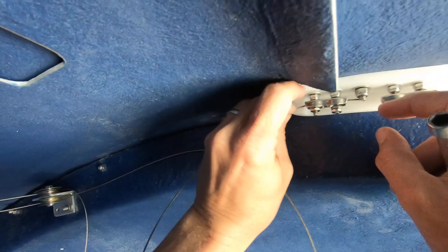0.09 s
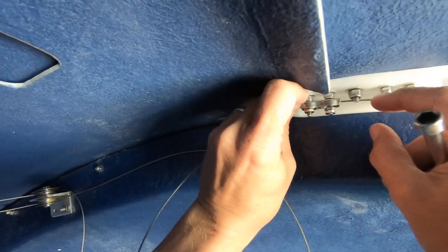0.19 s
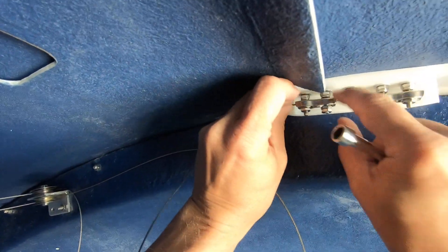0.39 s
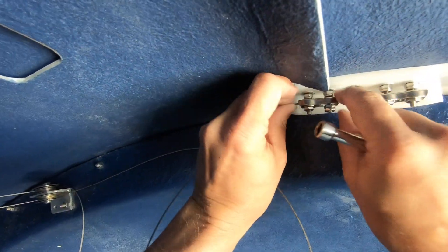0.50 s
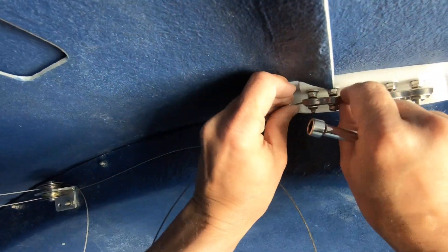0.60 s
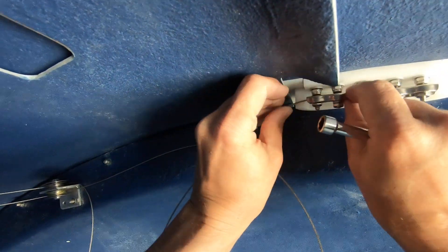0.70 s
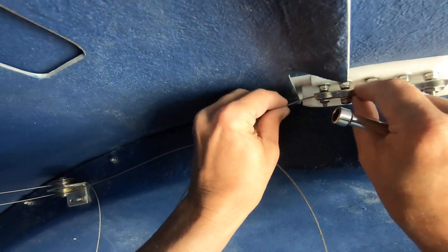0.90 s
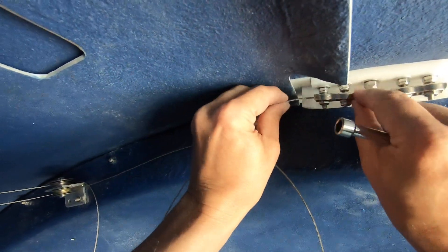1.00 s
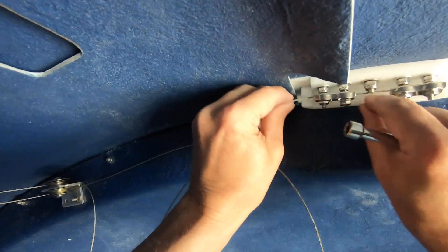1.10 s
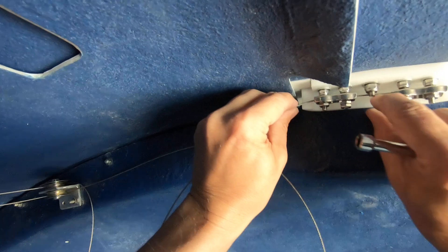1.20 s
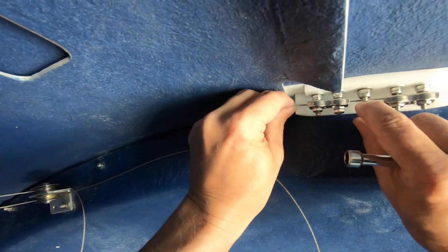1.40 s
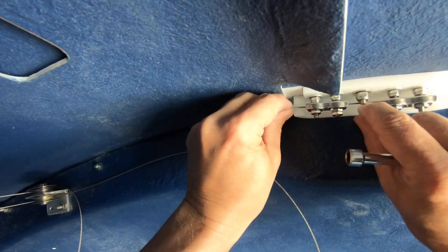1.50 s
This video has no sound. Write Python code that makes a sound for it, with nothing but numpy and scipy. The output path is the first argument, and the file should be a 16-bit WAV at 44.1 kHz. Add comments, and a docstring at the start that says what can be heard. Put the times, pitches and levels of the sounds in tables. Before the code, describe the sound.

Bright metallic clicks and faint cable rasps from small pulleys and a clamp, first in a quick cluster, then a low hollow thump, a sparse gap, and a sharper final cluster; close microphone, small room.

```python
"""Steel cable worked through small pulleys and a clamp clicks and rasps: contact noise excites metal resonances.
The clamp sits on a hollow moulded shell, close by, indoors; handling draws knocks (noise bands and decaying
modes), low thumps (damped sines) and a brief groan (a gliding tone) from the shell.
A small room rings after the metal (convolution with decaying noise), and a faint rising chirp comes near the end.
Beneath lie the rumble of the hands and the steady air of the room, both filtered noise."""
import sys
import numpy as np
from scipy import signal
from scipy.fft import rfft, irfft, next_fast_len
from scipy.io import wavfile

SR = 44100
rng = np.random.default_rng(int(sys.argv[2]) if len(sys.argv) > 2 else 0)


def digitize_waveform(pressure):
    """Quantize a signal to 16-bit integers and store it at the path in sys.argv[1].

    Rows of a 2-D input are taken as channels; values are limited to [-1, 1].
    """
    field = np.atleast_2d(pressure).T
    bounded = np.clip(field, -1, 1)
    quanta = np.round(bounded * 32767).astype(np.int16)
    wavfile.write(sys.argv[1], SR, quanta)


N = 68355
METAL_WIDTH = 0.63  # side against mid


def undb(db):
    """Amplitude ratio: the inverse of the decibel's logarithm."""
    return 10 ** (np.asarray(db) / 20)


def unit(x):
    """Normalise mean power: scale to an rms of 1."""
    return x / np.sqrt(np.mean(x ** 2) + 1e-20)


def on_log(hz, points):
    """Logarithmic frequency scale: interpolate (f/Hz, value) points along it."""
    p = np.array(points, float)
    return np.interp(np.log(np.maximum(hz, 1)), np.log(p[:, 0]), p[:, 1])


def colour(x, points, modes=()):
    """Minimum-phase filtering: a spectrum with resonance peaks, at unit power gain, made causal by its cepstrum."""
    size = 2 * next_fast_len(N)
    hz = np.arange(size // 2 + 1) * SR / size
    peaks = sum(undb(db) / (1 + (2 * (hz - f) / width) ** 2) for f, width, db in modes)
    gain = undb(on_log(hz, points)) * (1 + peaks)
    cepstrum = irfft(np.log(unit(gain)))
    # Folding the cepstrum onto positive time gives the minimum phase.
    cepstrum[1:size // 2] *= 2
    cepstrum[size // 2 + 1:] = 0
    response = np.exp(rfft(cepstrum))
    return irfft(rfft(x, size) * response)[..., :N]


def pan(db):
    """Interchannel level difference: left and right gains, positive to the left."""
    return undb(np.array([[db], [-db]]) / 2)


def noise(width):
    """Partly coherent stereo: white noise whose width is side against mid."""
    mid, side = rng.standard_normal((2, N))
    return unit(np.array([mid + width * side, mid - width * side]))


def since(start):
    """Elapsed time in seconds since a moment, zero before it."""
    return np.maximum(np.arange(N) / SR - start, 0)


def strike(start, rise, decay):
    """Impulsive loading: a smooth sine-squared rise, then exponential decay."""
    onset = np.sin(np.pi / 2 * np.minimum(since(start) / rise, 1)) ** 2
    return onset * np.exp(-since(start + rise) / decay)


def decay_60db(t, t60):
    """Exponential damping: amplitude falls by 60 dB in t60 seconds."""
    return np.exp(-np.log(1000) * t / t60)


def fade(x, start, t60s, share=1):
    """Frequency-dependent damping: overlapping octave bands of a noise each decay at their own rate."""
    spectrum = rfft(x)
    octave = np.log2(np.clip(np.fft.rfftfreq(N, 1 / SR), 125, 16000) / 125)
    out = 0
    for k in range(8):
        t60 = share * on_log(125 * 2 ** k, t60s)
        band = irfft(spectrum * np.maximum(1 - abs(octave - k), 0), N)
        out = out + band * decay_60db(since(start), t60)
    return out


def glide(curve, rough):
    """Frequency modulation: a sine integrates a pitch curve while low-passed noise wavers its amplitude."""
    times, hz, db = np.array(curve).T
    t = since(0)
    waver_filter = signal.butter(2, 110, fs=SR, output="sos")  # cutoff in Hz
    waver = unit(signal.sosfilt(waver_filter, rng.standard_normal(N)))
    phase = 2 * np.pi * np.cumsum(np.interp(t, times, hz)) / SR
    tone = np.sin(phase) * (1 + rough * waver)
    return tone * undb(np.interp(t, times, db)) * (t > times[0]) * (t < times[-1])


def fittings():
    """Source and resonator: contacts and cable rasp excite an upper and a lower register of metal modes."""
    # Ring spectra of the fittings: f/Hz, relative spectral level/dB
    upper_ring = [(2500, -19), (3600, -8.5), (4800, -8), (5800, -3), (7400, -3.5), (8100, -7), (8600, -18),
                  (9400, -15), (11000, -29), (12200, -21.5), (14600, -41), (15800, -40)]
    lower_ring = [(300, -21), (700, -6.5), (1300, 0), (1750, -3.5), (2300, 6), (3000, -7), (3700, -5),
                  (5500, -23), (10000, -101)]
    # Resonance peaks of the metal: f/Hz, width/Hz, height against the spectrum/dB
    metal_modes = [(2250, 600, -30), (2926, 270, 3), (5750, 200, -16), (5740, 130, -15), (6007, 180, 2),
                   (6300, 220, -11), (7240, 200, -3.5), (7780, 100, -12)]
    click_upper, click_lower = clicks()
    rasp_upper, rasp_lower = cable_rasp()
    upper = colour(click_upper + rasp_upper, upper_ring, metal_modes)
    lower = colour(click_lower + rasp_lower, lower_ring, metal_modes)
    return upper + lower


def clicks():
    """Contact excitation: short noise bursts at the pulleys and clamp drive both registers."""
    # Metal contacts: t/s, relative level/dB, relative lower-register level/dB, strongest ring f/Hz, decay/s
    contacts = [(0.0084, -23, -7, 5640, 0.0025), (0.0194, -32.5, -22, 5800, 0.0028),
                (0.144, -27, -14, 5700, 0.0031), (0.156, -18, -8.5, 5600, 0.00096),
                (0.1644, -29.5, 3, 5900, 0.0025), (0.1908, -28, -29, 5810, 0.0032),
                (0.2011, -22.5, -8.5, 7200, 0.0025), (0.2084, -29, -14, 6000, 0.0021),
                (0.2126, -33, -15, 6400, 0.0014), (0.2548, -21, -23, 5860, 0.0015),
                (0.2627, -8.5, -23.5, 7650, 0.0017), (0.3135, -17, -15.5, 7570, 0.0038),
                (0.3194, -26.5, -11, 6250, 0.0028), (0.5992, -34, 2, 6050, 0.0041),
                (0.6415, -26, 0, 6500, 0.004), (0.6491, -18.5, -16, 6240, 0.00094),
                (0.7424, -28, -28, 6500, 0.0025), (0.827, -38.5, -11, 6060, 0.0036),
                (0.8996, -31, 3, 5900, 0.002), (1.0448, -16.5, -2.5, 6200, 0.0021),
                (1.0513, -16.5, -21, 5930, 0.0025), (1.088, -19.5, -11, 7950, 0.0023),
                (1.1002, -27, -1, 5900, 0.0033), (1.1121, -25.5, -13, 6500, 0.003),
                (1.1189, -35, 4, 5890, 0.0018), (1.1918, -16, -8, 7200, 0.0019),
                (1.201, -2.5, -26.5, 5380, 0.0031), (1.2284, -27, -21, 6170, 0.0025),
                (1.2549, -25.5, 0, 7060, 0.0015), (1.2605, -21, -19.5, 6700, 0.0075),
                (1.265, -22, -10, 6250, 0.0028), (1.295, -39.5, 4.5, 6850, 0.0047)]
    # Place of the clicks: t/s, left-right difference/dB
    click_pan = [(0.15, 1), (0.27, 1.5), (0.6, 1), (1.25, 1.5)]
    level_db, upper_db, lower_offset_db, attack_s = -8.5, -4, 7.5, 0.0013
    upper, lower = np.zeros((2, 2, N))
    for start, db, lower_db, ring_hz, decay in contacts:
        shape = strike(start, attack_s, decay)
        shape_rms = np.sqrt(np.mean(shape ** 2))
        contact = unit(noise(METAL_WIDTH) * shape) * shape_rms * undb(db + level_db)
        place = pan(np.interp(start, *np.array(click_pan).T))
        upper += own_ring(contact, ring_hz) * undb(upper_db) * place
        lower += contact * undb(lower_db + lower_offset_db) * pan(-0.91)
    return upper, lower


def own_ring(x, hz):
    """Selective resonance: each contact favours one mode of the fitting that it strikes."""
    ring_db, width_hz = 4.5, 670
    b, a = signal.iirpeak(hz, hz / width_hz, fs=SR)
    return x + undb(ring_db) * signal.lfilter(b, a, x)


def cable_rasp():
    """Sliding friction: random strand impulses, smeared by decay, modulate noise through each slide."""
    # Cable slides: start t/s, length/s, relative level/dB, lower against upper register/dB, roughness/0-1
    slides = [(-0.02, 0.044, -38, -13.5, 0.43), (0.013, 0.062, -49.5, -5, 0.5),
              (0.069, 0.12, -48, 6.5, 0.65), (0.176, 0.0065, -38.5, 2, 0.5),
              (0.185, 0.051, -38.5, -2.5, 0.77), (0.258, 0.054, -51, 0.5, 0.3),
              (0.304, 0.027, -35, -12, 0.57), (0.598, 0.088, -56.5, 6, 0.6), (0.72, 0.015, -64.5, 10, 0.5),
              (0.732, 0.037, -53.5, 4.5, 0.6), (0.843, 0.003, -69, 0, .4), (0.985, 0.0063, -59, 5, 0.2),
              (1.014, 0.013, -55, 5.5, 0.1), (1.041, 0.021, -35.5, 1.5, 0.35), (1.05, 0.12, -47, -2, 0),
              (1.18, 0.039, -39, -3.5, 0.23), (1.251, 0.063, -46, -0.5, 0.65)]
    level_db, strands_per_s, grain_decay_s = 0.5, 790, 0.0015
    upper, lower = np.zeros((2, 2, N))
    for start, length, db, lower_db, rough in slides:
        strand_gain = undb(2.1 * rng.exponential(size=N).clip(0, 3))
        strands = (rng.random(N) < strands_per_s / SR) * strand_gain
        grain = unit(signal.lfilter([1], [1, -np.exp(-1 / (grain_decay_s * SR))], strands))
        swell = np.abs(np.sin(np.pi * np.minimum(since(start) / length, 1))) ** .5
        rasp = noise(METAL_WIDTH) * (1 - rough + rough * grain) * swell * undb(db + level_db)
        upper += rasp
        lower += rasp * undb(lower_db)
    return upper, lower


def shell_knocks():
    """Impact response: each knock sets off a clack, a dense boom and the shell's few long modes."""
    # Knocks: t/s, boom level/dB, clack level/dB, rise/s, ring time as a share of the shell's
    knocks = [(0.0, -38.5, -43, 0.0013, 1.12), (0.142, -35, -46, 0.056, 1.24),
              (0.234, -41.5, -41.5, .004, 1.62), (0.313, -40, -35.5, 0.00067, 0.45),
              (0.419, -33.5, -39.5, 0.0017, 1.07), (0.469, -34.5, -57, 0.0086, 1.3),
              (0.565, -27.5, -39, 0.032, 0.42), (0.901, -32.5, -36, 0.001, 0.88),
              (1.047, -31.5, -33.5, .002, 0.72), (1.121, -30, -35, 0.00092, 0.89),
              (1.13, -27, -50, 0.001, 0.78), (1.20, -37.5, -40, .006, 1.58),
              (1.404, -45.5, -68.5, 0.027, .9)]
    # Spectra of boom and clack: f/Hz, relative spectral level/dB
    boom_spectrum = [(40, -3), (100, -0.5), (200, -3), (350, -0.5), (520, 0.5), (680, -9.5), (1100, -28),
                     (2000, -32.5), (5000, -63), (12000, -91)]
    clack_spectrum = [(300, -9.5), (700, 3.5), (1400, 3), (2400, 1), (3400, -10), (4200, -19.5),
                      (5000, -17), (6800, -12), (8000, -31), (9000, -56), (14000, -75)]
    # Reference ring time of the shell: f/Hz, T60/s
    shell_t60 = [(100, 0.71), (300, 0.79), (600, 0.38), (1200, 0.61), (3000, 0.15), (8000, 0.19)]
    mode_db, pan_db, width = -3.5, -6, 0.33
    crack_db, crack_s = 2.5, 0.0021  # extra amplitude at the clack's onset and its decay
    out = 0
    for start, boom_db, clack_db, rise, share in knocks:
        t = since(start)
        onset = np.minimum(t / rise, 1)
        boom = colour(noise(width), boom_spectrum) * pan(pan_db) * undb(boom_db)
        crack = 1 + undb(crack_db) * np.exp(-t / crack_s)
        clack = colour(noise(0.9), clack_spectrum) * pan(-2.5) * undb(clack_db) * crack
        modes = shell_modes(t, share) * undb(boom_db + mode_db) * pan(pan_db)
        out = out + onset * (fade(boom + clack, start, shell_t60, share) + modes)
    return out


def shell_modes(t, share):
    """Modal superposition: damped sines of random phase at the shell's natural frequencies."""
    # Long modes: f/Hz, relative level/dB, reference T60/s
    mode_table = [(152.7, -6.5, 0.87), (210.7, -5.5, 0.61), (222.1, -3, 0.88), (289.4, 0.5, 0.83),
                  (373.3, -9, 0.19), (440, -11.5, 0.28), (462.6, -13.5, 0.78), (504, -13.5, 0.89),
                  (580, -7, 0.23), (703, -26, .5), (756, -11, 0.57)]
    out = 0
    for hz, db, t60 in mode_table:
        phase = rng.uniform(0, 2 * np.pi)
        out = out + undb(db) * np.sin(2 * np.pi * hz * t + phase) * decay_60db(t, t60 * share)
    return out


def shell_thumps():
    """Damped flexure: a soft push bends the panel for a few slow cycles."""
    # Soft pushes: t/s, relative level/dB, f/Hz, rise/s, decay/s
    pushes = [(0.227, -36, 111, 0.011, .02), (0.288, -35, 40.3, 0.018, 0.11),
              (0.589, -17, 128.2, 0.0091, 0.019), (0.602, -10.5, 67.4, 0.016, 0.025),
              (0.663, -35, 121.7, 0.0091, 0.091), (0.734, -33.5, 59.2, 0.008, 0.068),
              (0.80, -34.5, 35.6, 0.016, 0.032), (0.916, -27, 140.4, 0.011, 0.018),
              (0.927, -23, 63.6, 0.019, 0.03), (1.045, -32.5, 75, 0.0044, 0.035),
              (1.115, -24.5, 125, .012, 0.023), (1.21, -37.5, 122.3, 0.0067, 0.052),
              (1.259, -44.5, 60.2, 0.025, 0.059)]
    out = 0
    for start, db, hz, rise, decay in pushes:
        flexure = np.sin(2 * np.pi * hz * since(start))
        out = out + undb(db - 1) * strike(start, rise, decay) * flexure
    return pan(-9) * out


def groan():
    """Tonal friction: a low rubbing tone whose pitch rises slightly, then sinks."""
    # Groan: t/s, f/Hz, level before panning/dB
    groan_curve = [(0.10, 193, -56), (0.15, 201.7, -32), (0.18, 198.4, -48), (0.21, 164, -46),
                   (0.24, 142, -60), (0.28, 105, -45)]
    return glide(groan_curve, rough=.2) * pan(-5)


def chirp():
    """Rising frequency sweep: a faint, rough tone near the end."""
    # Chirp: t/s, f/Hz, level before panning/dB
    chirp_curve = [(1.41, 3130, -67), (1.425, 3200, -64), (1.445, 3400, -72.5), (1.47, 3820, -74),
                   (1.482, 4250, -59), (1.499, 4650, -69), (1.51, 5550, -64), (1.53, 6200, -54.5),
                   (1.54, 6440, -77)]
    return glide(chirp_curve, rough=.6) * pan(-8)


def room(x):
    """Diffuse reverberation: convolve with decaying noise, the tail of a small hard room."""
    # Reverberation time: f/Hz, T60/s
    room_t60 = [(300, 1), (2000, 0.45), (6000, 0.29), (12000, 0.34)]
    level_db, build_s = -9.5, 0.0021
    tail = fade(noise(0.85), 0, room_t60) * (1 - np.exp(-since(0) / build_s))
    impulse_response = unit(tail) / np.sqrt(N)
    return signal.fftconvolve(x, impulse_response, axes=1)[:, :N] * undb(level_db)


def background():
    """Shaped broadband noise: rumble from the hands over the steady air of the room."""
    # Handling rumble on the shell: t/s, level/dB
    handling = [(0, -41), (0.12, -46), (0.25, -34), (0.42, -45), (0.62, -32), (0.87, -47.5), (1.132, -36.5),
                (1.35, -42), (1.46, -48), (1.55, -72)]
    # Spectra of the rumble and the air: f/Hz, relative spectral level/dB
    rumble_spectrum = [(15, 0.5), (32, 0.5), (60, -1), (130, -0.5), (200, 0), (500, -50.5), (3000, -71.5)]
    air_spectrum = [(30, 0.5), (120, -1.5), (290, -5.5), (480, -7.5), (900, -29), (2500, -21.5),
                    (4800, -28), (6200, -24.5), (7600, -30.5), (8800, -47.5), (14500, -56), (16000, -73)]
    air_modes = [(275.6, 7.7, 1.7)]  # f/Hz, width/Hz, height/dB
    handling_db = np.interp(since(0), *np.array(handling).T)
    rumble = colour(noise(0.31), rumble_spectrum) * undb(handling_db)
    air = colour(noise(0.84), air_spectrum, air_modes) * undb(-51) * pan(-4.5)
    return rumble + air


def scene():
    """Linear superposition: metal and chirp with their reverberation, the shell and the background."""
    bright = fittings() + chirp()
    shell = shell_knocks() + shell_thumps() + groan()
    return bright + room(bright) + shell + background()


def record(dry):
    """Band limitation: a steep elliptic low-pass cuts the top."""
    top_hz = 15859
    return signal.sosfilt(signal.ellip(8, .2, 70, top_hz, fs=SR, output="sos"), dry)


dry = scene()
out = record(dry)
digitize_waveform(out)
```